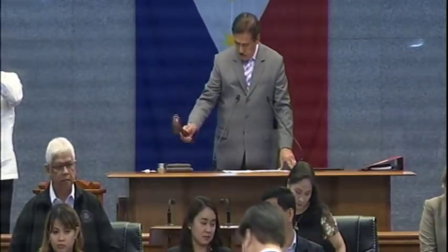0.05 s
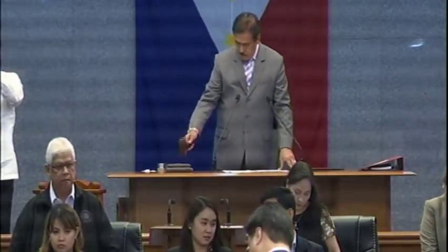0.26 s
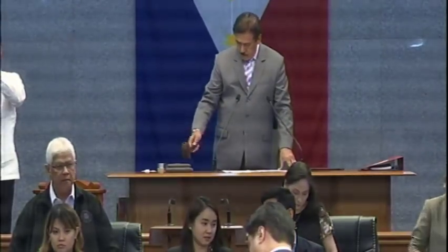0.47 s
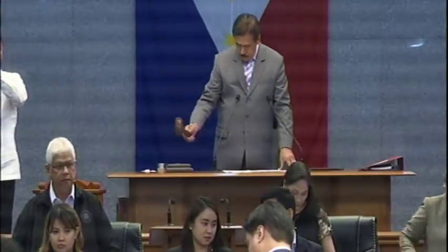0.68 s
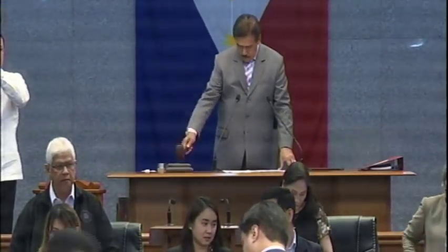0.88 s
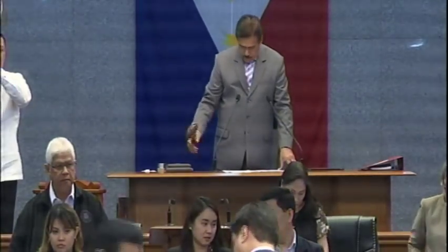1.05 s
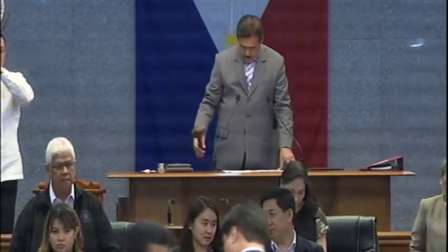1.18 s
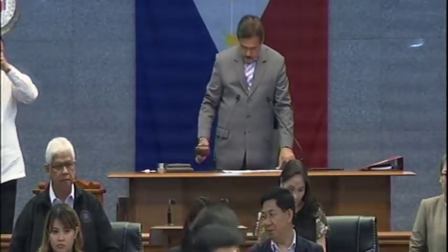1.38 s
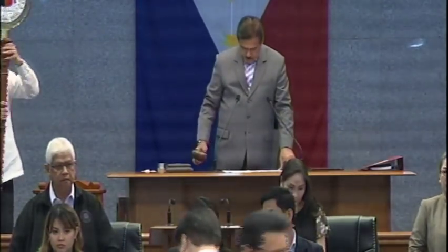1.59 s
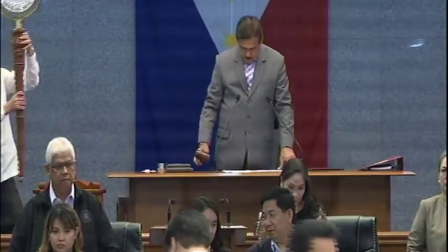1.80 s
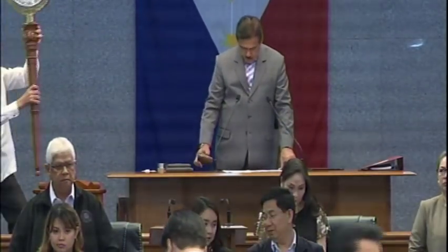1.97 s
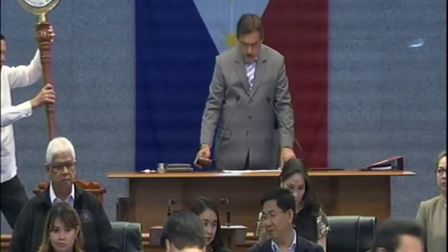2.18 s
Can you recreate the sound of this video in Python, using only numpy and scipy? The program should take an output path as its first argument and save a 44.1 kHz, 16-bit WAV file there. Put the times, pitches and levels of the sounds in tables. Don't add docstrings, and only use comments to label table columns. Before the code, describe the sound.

Wooden gavel knocks twice, hard and slightly overloaded, on a rostrum in a large carpeted chamber

```python
import sys
import numpy as np
from scipy import signal
from scipy.fft import rfft, irfft
from scipy.io import wavfile
from scipy.ndimage import uniform_filter1d

SR = 44100
rng = np.random.default_rng(int(sys.argv[2]) if len(sys.argv) > 2 else 0)


def waveform_to_disk(signal):
    frames = np.transpose(np.atleast_2d(signal))
    scaled = np.clip(frames, -1, 1) * 32767
    samples = np.round(scaled).astype(np.int16)
    wavfile.write(sys.argv[1], SR, samples)


def nominal_scale(level):
    x = np.asarray(level, float) / 20
    return 10 ** x


N = 98739
T = np.arange(N) / SR

# start_s, level_db, bright_db, metal_db
STRIKES = [
    (-.58, -6, -7, -11),
    (.1610, -7.5, -1.5, 2.5),
    (0.9038, -6.5, -1, 9),
]
# pitch_hz, level_db, t60_s
BLOCK_MODES = [(461.6, -8, 0.031), (510.7, 1.5, 0.075), (577, -4.5, 0.059), (669, -7, 0.052),
               (900, -8, 0.05), (1172, -5, 0.023), (2052, -1.5, 0.024), (2326, 1.5, 0.012),
               (3870, -12.5, 0.027), (5570, -16, 0.0064)]
# pitch_hz, level_db, t60_s
DESK_MODES = [(76.3, -41, 1.4), (132.3, -15, 0.53), (180.3, -28, 1.786), (207, -21.5, 0.63),
              (232.3, -13.5, 0.34), (277.8, -25, 0.81), (316, -41.5, 0.38), (348.7, -36, 0.13),
              (469, -27, 0.88), (499, -33, 0.42), (539, -21.5, 0.75), (631.5, -28.5, 0.68),
              (668, -17.5, .25)]
# pitch_hz, level_db, t60_s
METAL_MODES = [(1112, -43, 0.45), (1230, -47, 0.73), (1810, -50.5, 0.97), (1987, -48.5, 0.62),
               (1980, -42, 0.74), (2110, -45.5, 0.9), (2340, -42.5, .8), (2266, -55, 0.76),
               (3830, -43.5, 0.5), (3873, -43.5, 0.55), (4670, -56, .3)]
# delay_s, level_db
ECHOES = [(.0045, 16.5), (.0165, -1), (.027, 2), (.037, -8.5), (.045, -10), (.058, -17), (.075, -16),
          (.095, -21.5)]
# centre_hz, density_db (per Hz), t60_s
HALL = [(120, -43, 0.31), (250, -10.5, 0.51), (540, -7.5, 0.55), (830, -14, 0.4), (2400, -17, 0.46),
        (2694, -26.5, 0.51), (7000, -30.5, .28), (15000, -47, 0.17)]
# centre_hz, density_db (per Hz)
AIR = [(41, -31), (70, -5.5), (216, -4), (272, 2.5), (410, -17.5), (527, -5.5), (1100, -18.5),
       (2360, -18.5), (5000, -24), (6500, -68.5), (11000, -120)]
# pitch_hz, level_db
HUM = [(60, -75), (120, -77.5), (180, -83), (963, -87.5), (15734, -92.5)]
BUZZ_GAPS = [(1, 1), (3, 4), (9, 12), (24, 1), (32, 5), (42, 3), (46, 2), (49, 2), (52, 1), (54, 14),
             (70, 4), (76, 1), (80, 2), (86, 2), (90, 1), (94, 1), (97, 2), (101, 1), (105, 2), (112, 1),
             (121, 1), (123, 3), (127, 2)]
# offset_s (from mid whistle), level_db
SPARKS = [(-.0040, -3), (.0017, -3), (.0039, 0), (.0052, -7)]
# start_s, length_s, from_hz, to_hz, level_db
SQUEAKS = [
    (.11, 0.079, 9800, 10900, -84),
    (.33, 0.046, 10320, 10200, -87),
    (.41, 0.11, 9900, 10200, -81),
]
# start_s, level_db, pitch_hz, t60_s
TICKS = [
    (.765, -80, 3850, .12),
    (1.60, -79, 1480, .3),
    (1.614, -71, 2080, .09),
    (1.616, -76, 3000, .02),
]
# pitch_hz, level_db, t60_s
SETTLE_MODES = [(5, -45.5, .9), (20, -47.5, 0.24)]

BLOW_DB, CONTACT_S = -7.5, 0.00055
CRACK_DB, CRACK_T60_S = -2.5, 0.02
DIRECT_BODY_DB, DESK_RISE_CYCLES = -6.5, 2.5
ECHO_TREBLE_DB, ECHO_DULL_HZ, ECHO_DULL_S = -3.5, 9700, 0.028
HALL_DB, HALL_RISE_S = -29.5, 0.0016
OWN_SHARE = 0.28
AIR_DB = -68
FIELD_HZ = 59.94
BUZZ_AT_S, BUZZ_LENGTH_S = 0.0154, 0.0044
BUZZ_HZ, BUZZ_SWING_HZ = 5890, 120
BUZZ_DB, BUZZ_OCTAVE_DB, SPARK_DB = -71.5, -3, -62.5
HISS_DB, HISS_IN_FIELD_DB, HISS_SIDE_DB = -86, 6, -98.5
POP_S, POP_DB = 0.3205, -54
RUSTLE_S, RUSTLE_LENGTH_S, RUSTLE_DB = 1.83, 0.1, -77
CEILING_DB, KNEE = -19, 5
LOW_CUT_HZ, HIGH_CUT_HZ, TOP_CUT_HZ = 20, 3240, 17000
LEFT_LAG_S, SIDE_TOP_HZ = 0.000021, 11030


def level(x, db):
    return x * nominal_scale(db) / np.sqrt(np.mean(x ** 2))


def band(x, hz, width_hz):
    return signal.lfilter(*signal.iirpeak(min(hz, 0.45 * SR), hz / width_hz, fs=SR), x)


def noise_band(hz, width_hz):
    return band(rng.standard_normal(N), hz, width_hz)


def read(table, hz, column=1):
    table = np.array(table)
    return np.interp(np.log(hz), np.log(table[:, 0]), table[:, column])


def fade(t, t60_s, rise_s=1e-5):
    t = np.maximum(t, 0)
    return (1 - np.exp(-t / rise_s)) * np.exp(-np.log(1000) * t / t60_s)


def ring(t, modes, scatter_db, bright_db, rise_s, rise_cycles=0.):
    out = 0
    for hz, db, t60_s in modes:
        gain = nominal_scale(db + scatter_db * rng.standard_normal() + bright_db * (hz > 1000))
        out = out + gain * fade(t, t60_s, rise_s + rise_cycles / hz) * np.sin(2 * np.pi * hz * t)
    return out


def walk(rate_hz):
    k = int(SR / rate_hz)
    steps = np.repeat(rng.standard_normal(N // k + 1), k)
    return 0.44 * uniform_filter1d(uniform_filter1d(steps, k), k)[:N]


def gavel():
    hall_noise, out = rng.standard_normal(N), 0
    for at_s, db, bright_db, metal_db in STRIKES:
        t = T - at_s
        noise = np.sqrt(1 - OWN_SHARE ** 2) * np.roll(hall_noise, int(at_s * SR))
        noise = noise + OWN_SHARE * rng.standard_normal(N)
        body = ring(t, BLOCK_MODES[:4], 1.0, bright_db, CONTACT_S)
        knock = ring(t, BLOCK_MODES[4:], 1.5, bright_db, CONTACT_S)
        knock += nominal_scale(CRACK_DB + bright_db) * fade(t, CRACK_T60_S, CONTACT_S) * band(noise, 2500, 4000)
        sound = ring(t, DESK_MODES, 0.4, bright_db, CONTACT_S, DESK_RISE_CYCLES)
        sound = sound - knock - nominal_scale(DIRECT_BODY_DB) * body
        sound += nominal_scale(metal_db) * nominal_scale(3.0 * walk(40)) * ring(t, METAL_MODES, 2.07, 0, 0.013)
        returned = nominal_scale(ECHO_TREBLE_DB) * knock + body
        for delay_s, echo_db in ECHOES:
            k = int(delay_s * SR)
            dull = signal.butter(2, ECHO_DULL_HZ / (1 + delay_s / ECHO_DULL_S), fs=SR)
            sound[k:] += nominal_scale(echo_db) * signal.lfilter(*dull, returned[:-k])
        out = out + nominal_scale(BLOW_DB + db) * (sound + hall(t, noise, bright_db))
    return out


def hall(t, noise, bright_db):
    spectrum, out = rfft(noise), 0
    octave = np.log2(np.arange(1, N // 2 + 2) * SR / N)
    for hz in 80 * 2 ** np.arange(0, 7.75, .25):
        share = np.cos(np.pi / 2 * np.clip(4 * (octave - np.log2(hz)), -1, 1)) ** 2
        gain = nominal_scale(HALL_DB + read(HALL, hz) + bright_db * (hz > 1000) + 40.5)
        out = out + gain * fade(t, read(HALL, hz, column=2), HALL_RISE_S) * irfft(spectrum * share, N)
    return out


def air():
    out, swell = 0, walk(0.92)
    for hz in 35 * 2 ** np.arange(0, 8, .5):
        db = read(AIR, hz) + 1.0 * swell + 0.63 * walk(17)
        out = out + nominal_scale(db) * band(noise_band(hz, hz / 2), hz, hz / 2)
    return level(out, AIR_DB)


def mains_hum():
    return sum(np.sqrt(2) * nominal_scale(db + walk(3.7)) * np.sin(2 * np.pi * (hz * T + rng.random()))
               for hz, db in HUM)


def picture_cable():
    place = (T - BUZZ_AT_S) * FIELD_HZ
    field = np.round(place)
    offset_s = (place - field) / FIELD_HZ
    inside = abs(offset_s) < BUZZ_LENGTH_S / 2
    silent = np.concatenate([np.arange(first, first + count) for first, count in BUZZ_GAPS])
    on = ~np.isin(field, silent)
    gate = uniform_filter1d(on * inside * 1., size=40) * nominal_scale(1.2 * walk(54))
    bend = np.cos(np.pi * (offset_s / BUZZ_LENGTH_S - .1) * 2)
    phase = 2 * np.pi * np.cumsum(BUZZ_HZ + BUZZ_SWING_HZ * bend) / SR
    buzz = nominal_scale(BUZZ_DB) * gate * (np.sin(phase) + nominal_scale(BUZZ_OCTAVE_DB) * np.cos(2 * phase))
    spark_shape = sum(nominal_scale(db) * fade(offset_s - at_s, 0.002) for at_s, db in SPARKS)
    sparks = nominal_scale(SPARK_DB + 1.5 * walk(88)) * spark_shape * noise_band(7100, 7800)
    hiss = level(noise_band(13500, 11000), HISS_DB) * nominal_scale(HISS_IN_FIELD_DB * inside)
    pop = np.zeros(N)
    pop[int(POP_S * SR)] = nominal_scale(POP_DB)
    return buzz + sparks + hiss + 4 * band(pop, 9000, 10000)


def squeaks():
    out = 0
    for at_s, length_s, from_hz, to_hz, db in SQUEAKS:
        t = T - at_s
        shape = np.sin(np.pi * np.clip(t / length_s, 0, 1)) ** .5
        mean_hz = from_hz + (to_hz - from_hz) * t / length_s / 2
        out = out + nominal_scale(db) * shape * np.sin(2 * np.pi * mean_hz * t)
    return out


def ticks():
    return sum(nominal_scale(db) * fade(T - at_s, t60_s) * level(noise_band(hz, 7 / t60_s), 0)
               for at_s, db, hz, t60_s in TICKS)


def rustle():
    shape = np.exp(-((T - RUSTLE_S) / RUSTLE_LENGTH_S) ** 2) * nominal_scale(3.6 * walk(60))
    return shape * level(noise_band(3200, 2500), RUSTLE_DB)


def scene():
    return np.tile(gavel() + air() + squeaks() + ticks() + rustle(), (2, 1))


def roll_off(x):
    return signal.sosfilt(signal.butter(12, 16250, fs=SR, output="sos"), x)


def record(dry):
    x = dry[0] / nominal_scale(CEILING_DB)
    x = nominal_scale(CEILING_DB) * x / (1 + abs(x) ** KNEE) ** (1 / KNEE)
    x = signal.lfilter(*signal.butter(1, [LOW_CUT_HZ, HIGH_CUT_HZ], "band", fs=SR), x)
    x = signal.lfilter(*signal.butter(1, TOP_CUT_HZ, fs=SR), x)
    x = x + mains_hum() + picture_cable()
    x = x + sum(ring(T - at_s, SETTLE_MODES, 1.0, 0, 0.003) for at_s, *_ in STRIKES)
    lag = np.gradient(x) * SR * LEFT_LAG_S / 2
    side = level(noise_band(6000, 8000), HISS_SIDE_DB) - lag
    side = signal.filtfilt(*signal.butter(2, SIDE_TOP_HZ, fs=SR), side)
    return roll_off(np.array([x + side, x - side]))


dry = scene()
out = record(dry)
waveform_to_disk(out)
```